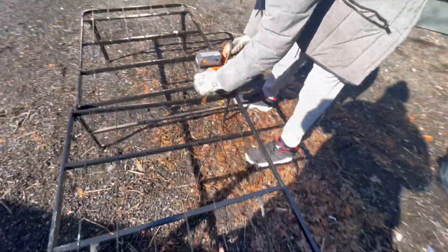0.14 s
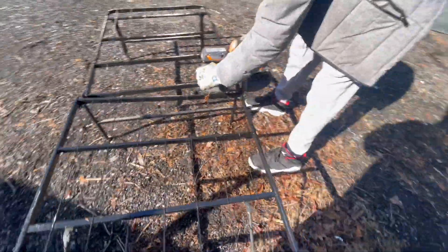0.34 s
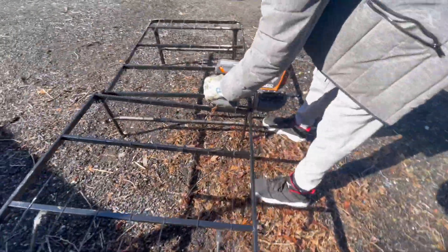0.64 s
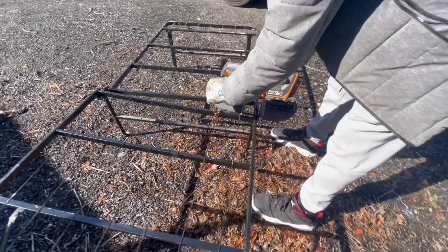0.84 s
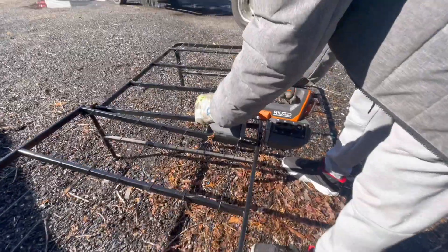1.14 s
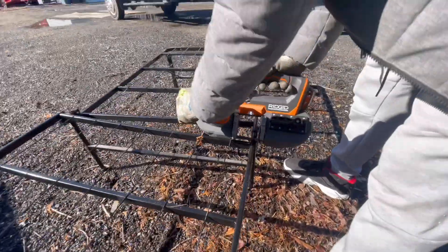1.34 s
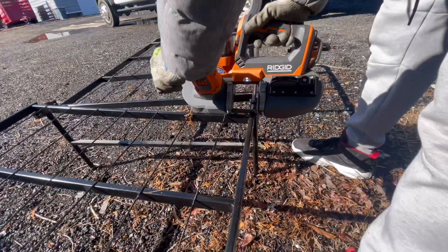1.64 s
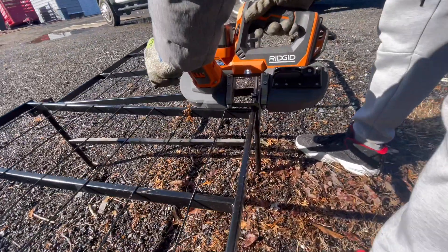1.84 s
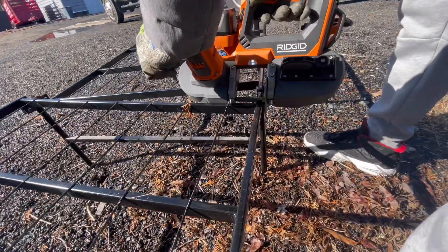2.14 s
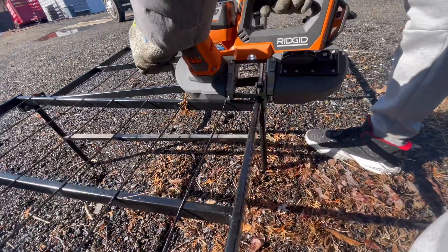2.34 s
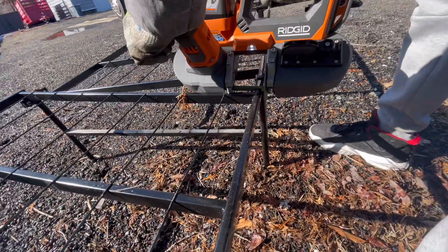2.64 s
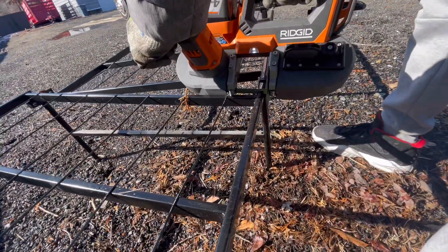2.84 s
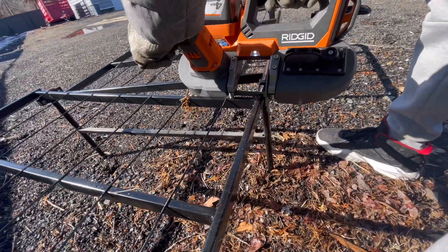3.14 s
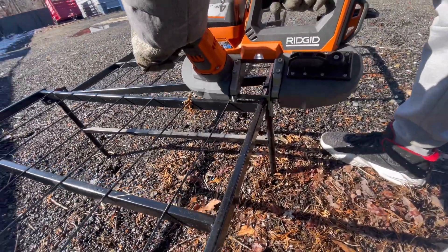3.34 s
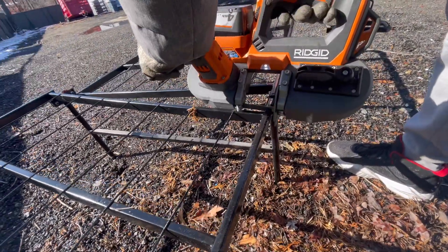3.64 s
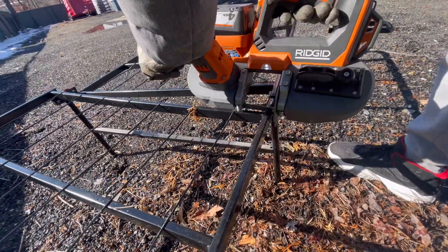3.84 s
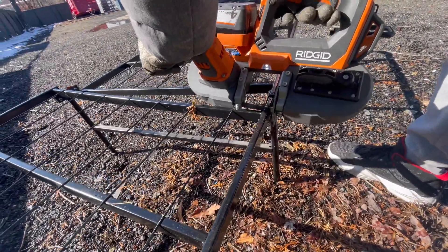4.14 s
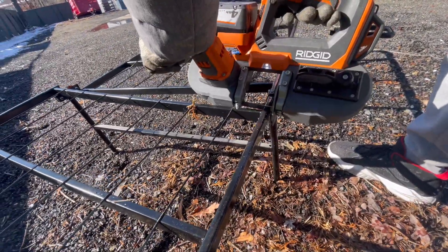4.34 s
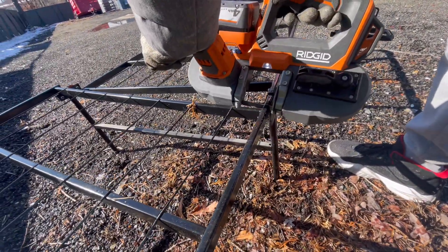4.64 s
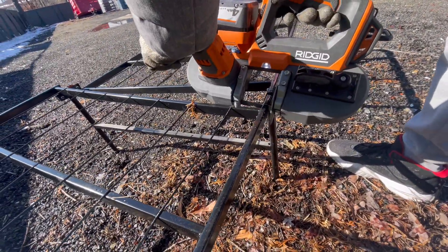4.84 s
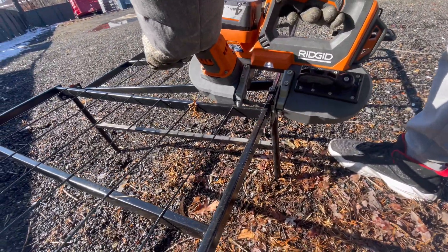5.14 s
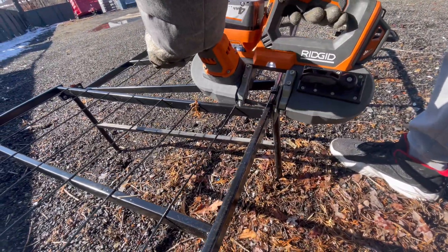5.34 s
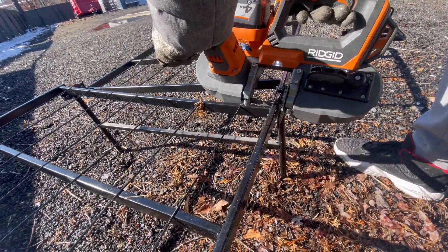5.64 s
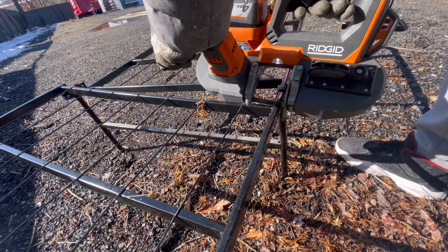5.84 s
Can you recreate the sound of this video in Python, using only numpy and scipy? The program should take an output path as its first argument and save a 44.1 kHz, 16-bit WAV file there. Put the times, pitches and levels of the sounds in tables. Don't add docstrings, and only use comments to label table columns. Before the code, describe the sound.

From 0 s a handheld bandsaw is already cutting a thin steel rail outdoors: loud bright rasp, motor and gear whirr, low frame chatter until about 0.3 s, and wind rumbling on the microphone until about 0.7 s. Whistling rail notes and brief piercing squeals dart through the first second, with heavy seam thumps near 0.4 and 0.65 s. From roughly 0.9 to 1.6 s the cutting thins and motor whirr is more exposed. At about 1.7 s the teeth catch sharply and a dense, gritty high hiss settles in as the phone comes close. The blade seam knocks and scrapes every 0.27 s, each followed by a small dip. Pressure eases briefly near 2.8 and 3.4 s; tonal whines lock in around 3.5 to 4.5 s. The rail rings less from 4 s, the speed sagging slightly at seams, then the cut softens after 5.5 s, still running at 6 s.

```python
import sys
import numpy as np
from scipy import signal
from scipy.fft import rfft, irfft, next_fast_len
from scipy.io import wavfile
from scipy.ndimage import uniform_filter1d

SR = 44100
rng = np.random.default_rng(int(sys.argv[2]) if len(sys.argv) > 2 else 0)


def volts(x):
    e = np.asarray(x, float) / 20
    return 10 ** e


def wav_record(signal):
    frames = np.transpose(np.atleast_2d(signal))
    bounded = np.clip(frames, -1, 1)
    quanta = np.round(bounded * 32767).astype(np.int16)
    wavfile.write(sys.argv[1], SR, quanta)


N = 264849
T = np.arange(N) / SR
PAD = next_fast_len(N + SR // 3)
HZ = np.arange(PAD // 2 + 1) * SR / PAD + 1e-9


def unit(x):
    return x / np.sqrt(np.mean(x ** 2))


def curves(table):
    s, *columns = np.transpose(table)
    return [np.interp(T, s, column) for column in columns]


def gains(table):
    hz, db = np.transpose(table)
    return volts(np.interp(np.log(HZ), np.log(hz), db))


def through(x, response):
    return irfft(rfft(x, PAD) * response, PAD)[..., :N]


def resonance(hz, width_hz):
    return 1j * HZ * width_hz / (hz ** 2 - HZ ** 2 + 1j * HZ * width_hz)


def band(lo_hz, hi_hz, order=8):
    low_cut = 1 + np.minimum(lo_hz / HZ, 9) ** (2 * order)
    high_cut = 1 + (HZ / hi_hz) ** (2 * order)
    return 1 / np.sqrt(low_cut * high_cut)


def walk(rate):
    hold = int(SR / rate)
    steps = np.repeat(rng.standard_normal(N // hold + 1), hold)
    slewed = uniform_filter1d(uniform_filter1d(steps, hold), hold)
    return unit(slewed[:N])


def bump(at_s, width_s):
    return np.exp(-.5 * ((T - at_s) / width_s) ** 2)


def clicks(at_s, size):
    place, out = at_s * SR, np.zeros(N + 32)
    for k in range(-7, 9):
        i = np.floor(place).astype(int) + k
        window = np.cos(np.pi * (i - place) / 16) ** 2
        np.add.at(out, np.clip(i, 0, N + 31), size * np.sinc(i - place) * window)
    return out[:N]


# (t/s, whirr level/dB, shaft tone level/dB)
MOTOR = [(0.0, -30.5, -85), (0.35, -30.5, -66), (0.7, -42.5, -61), (.8, -42.5, -57), (1.0, -40.5, -53),
         (1.4, -37, -51.5), (1.72, -35, -51), (1.95, -35.5, -53), (2.1, -36, -55), (2.4, -40.5, -58.5),
         (3.76, -41, -59.5), (4.85, -47.5, -68), (6.01, -48, -63)]
# (f/Hz, level/dB per Hz)
WHIRR = [(88, -70), (150, -25), (328, -25.5), (361, -21.5), (398, -15), (578, -10.5), (716, -5.5),
         (1660, -3.5), (2270, -3.5), (3840, -2), (5910, -17.5), (7920, -11.5), (16000, -18)]
# (multiple of shaft rate, level/dB)
GEAR = [
    (2, 10),
    (4, 2),
    (8, 1),
    (10.2, 2),
]


def motor(group_hz):
    whirr_db, shaft_db = curves(MOTOR)
    turn = np.pi * np.cumsum(group_hz * (1 + 0.00037 * walk(24.7))) / SR
    tones = volts(shaft_db + 1.5 * walk(3.76)) * np.sin(turn)
    for multiple, db in GEAR:
        level_db = np.minimum(whirr_db, -42.0) - 16.5 + db + 3.54 * walk(20)
        tones = tones + volts(level_db) * np.sin(multiple * turn + 0.54 * walk(40))
    crackle = volts(2.4 * rng.standard_normal(N)) * rng.standard_normal(N)
    whirr = through(crackle, gains(WHIRR))
    low = through(whirr, band(400, 2290))
    return tones + volts(whirr_db + 1.96 * walk(14)) * whirr / np.std(low)


# (t/s, whine level/dB, freedom level/dB)
FEED = [(0.0, -27, -3.5), (0.25, -28.5, 1), (0.42, -25, -1), (0.78, -28, -5.5), (0.9, -33, 2.5),
        (1.15, -41, 4), (1.6, -42.5, 4.5), (1.72, -30, -4.5), (1.87, -25, -3.5), (2.5, -26, -8),
        (2.95, -26.5, -5.5), (3.2, -30.5, -2), (3.6, -25, -6.5), (4.2, -23, -13), (4.6, -26, -12.5),
        (5.45, -29.5, -11), (5.62, -35, -9.5), (6.01, -33.5, -10.5)]


def feed():
    return curves(FEED)


# (f/Hz, width/Hz, level/dB)
BITE = [(2900, 100, -14), (3740, 160, -10), (4245, 48, 0.5), (5050, 170, -8), (6000, 180, -4),
        (6560, 135, -3.5), (7066, 200, 2), (8100, 85, 7), (8610, 174, 3), (11350, 150, -3.5),
        (12440, 530, 1), (14150, 500, 11), (15050, 350, 10)]
# (f/Hz, level/dB per Hz)
SCRAPE = [(590, -47), (1000, -21), (1730, -27.5), (2100, -1.5), (2500, -13), (4260, -6.5), (5440, -11),
          (6470, 3.5), (7530, -6), (8450, 2), (9830, -9), (13100, 9.5), (16000, -40)]
SET_DB = (8, 0, -1)


def teeth(group_hz, jitter=0.054, wear_db=0.5, chip_db=2.5, scrape_db=-2.5, skirt_db=-11.0):
    loop_teeth = 592
    count = np.cumsum(3 * group_hz) / SR
    n = np.arange(int(count[-1]))
    chance, wear = rng.standard_normal((len(n), 2)), rng.standard_normal(loop_teeth)
    size_db = np.array(SET_DB)[n % 3] + wear_db * wear[n % loop_teeth] + chip_db * chance[:, 0]
    at_s = np.interp(n + .5 + jitter * chance[:, 1], count, T)
    body = volts(skirt_db) + sum(volts(db) * resonance(hz, width) for hz, width, db in BITE)
    strikes = unit(through(clicks(at_s, volts(size_db)), body))
    tooth_now = np.minimum(count.astype(int), len(n) - 1)
    tearing = volts(size_db[tooth_now]) * rng.standard_normal(N)
    return strikes + volts(scrape_db) * unit(through(tearing, gains(SCRAPE)))


def steel(x):
    t60_s, share = .11, .8
    tail = np.arange(SR // 5) / SR
    ring = rng.standard_normal((2, len(tail))) * volts(-60 * tail / t60_s)
    ring = ring / np.sqrt(np.sum(ring ** 2, axis=1, keepdims=True))
    ring = through(x, rfft(ring, PAD))
    shift = np.pi * T / 2 + .5 * walk(1.947)
    return np.sqrt(1 - share ** 2) * x + share * (np.cos(shift) * ring[0] + np.sin(shift) * ring[1])


CUT_EDGES_HZ = (1600, 2600, 5400, 9800)
# (level/dB, share of rail freedom, share of quick pressure changes)
REGISTERS = [
    (-9.5, 0.97, 0.8),
    (-1.16, 0.83, 0.41),
    (0.02, 0.011, 0.94),
    (-3, 0.37, 0.79),
]


def cut(group_hz, feed_db, free_db, jolt_db):
    bite, edges = steel(teeth(group_hz)), (*CUT_EDGES_HZ, SR)
    shared_db = 1.5 * walk(45)
    mix = np.zeros(N)
    for lo, hi, (db, free, quick) in zip(edges, edges[1:], REGISTERS):
        level_db = feed_db + db + free * free_db + quick * jolt_db
        register = unit(through(bite, band(lo, hi)))
        mix = mix + volts(level_db + shared_db + 1.2 * walk(30)) * register
    return mix


# (level/dB re whine, share of rail freedom, patchiness level/dB)
SING_DB = [
    (-18.5, 0.3, 3),
    (-17.5, 0.4, 7),
    (-16, 0.13, 6),
    (-17.5, 0.096, 6),
]
# (t/s,
# length/s, group harmonic, level/dB)
SQUEAL = [(0.107, 0.32, 1, -39), (0.308, 0.033, 3, -23.5), (0.408, 0.058, 2, -32), (.42, 0.054, 6, -12.5),
          (0.81, 0.12, 4, -28), (1.0, 0.081, 3, -31), (1.89, 0.043, 4, -36), (2.1, 0.078, 4, -31),
          (4.4, 0.17, 3, -32), (4.633, 0.089, 3, -29.5), (0.0, 0.17, 3, -33), (.18, 0.054, 3, -30.5),
          (.45, 0.12, 3, -28.5), (.63, 0.095, 3, -35), (1.66, .04, 3, -33), (1.725, 0.029, 3, -31),
          (1.84, 0.036, 3, -34), (2.07, 0.082, 3, -31.5), (2.9, 0.11, 3, -33.5), (5.1, 0.066, 3, -55),
          (5.24, 0.098, 3, -50), (5.8, 0.23, 3, -46.5), (.3, 0.066, 9, -22), (.5, .06, 12, -25),
          (.6, 0.12, 12, -34), (3.28, 0.11, 12, -35), (5.15, .12, 9, -51), (2.62, 0.057, 9, -44),
          (.35, 0.065, 1, -43), (.482, 0.032, 1, -32), (.53, 0.022, 1, -40), (.575, .05, 1, -41),
          (.47, 0.18, 2, -44), (.76, 0.038, 2, -44), (.82, 0.11, 2, -49), (.49, 0.075, 4, -34),
          (.42, .07, 5, -38), (.55, .1, 5, -34), (.71, 0.06, 6, -35), (.75, 0.045, 3, -37),
          (3.94, 0.16, 3, -35.5), (4.28, 0.12, 3, -41.5),
          (0.203, 0.086, 6, -23), (0.306, 0.052, 6, -19.5), (0.48, 0.07, 6, -19.5), (0.603, 0.21, 6, -39),
        (0.383, 0.049, 9, -20.5), (1.087, .22, 6, -38), (1.651, 0.038, 12, -24), (1.94, 0.031, 6, -28),
        (2.075, 0.11, 6, -36), (2.09, 0.071, 12, -23.5), (2.203, 0.088, 6, -23.5), (2.42, 0.093, 6, -32),
        (2.434, 0.078, 9, -27), (2.849, 0.051, 9, -43), (2.875, 0.11, 12, -45), (3.504, 0.13, 3, -35),
        (3.528, 0.14, 9, -25), (3.529, 0.1, 12, -23), (3.736, 0.11, 12, -32), (3.852, 0.0695, 3, -26.5),
        (3.899, 0.37, 12, -27.5), (4.014, 0.06, 9, -39), (4.107, 0.11, 3, -29), (4.449, 0.2, 12, -27),
        (4.495, 0.11, 9, -47), (4.884, 0.08, 12, -28), (4.903, 0.16, 9, -37), (5.299, 0.068, 12, -47),
        (5.302, 0.19, 9, -29.5)]


def sing(group_hz, whine_db, free_db, rasp=.3):
    swell_s = .014
    turn = 2 * np.pi * np.cumsum(group_hz) / SR
    slip, quick_slip = .4 * walk(70), rasp * walk(220)
    tone = {}
    for h in (1, 2, 3, 4, 5, 6, 9, 12):
        tone[h] = np.sin(h * (turn + slip / 3) + max(h / 3 - 1, 0) * quick_slip)
    tones = np.zeros(N)
    for k, (db, free, patchy_db) in enumerate(SING_DB):
        level_db = whine_db + db + free * free_db + patchy_db * walk(50) + 2.4 * walk(16)
        tones = tones + volts(level_db) * np.sqrt(2) * tone[3 * k + 3]
    flutter = [volts(2.6 * walk(50.6)) for _ in range(4)]
    for k, (s, length, harmonic, db) in enumerate(SQUEAL):
        swell = np.clip(np.minimum(T - s, s + length - T) / swell_s + .3, 0, 1)
        tones = tones + swell * volts(db) * flutter[k % len(flutter)] * tone[round(harmonic)]
    return tones


# (f/Hz, level/dB, t60/s)
THUMP = [(700, -19.5, 0.088), (863, -1, 0.045), (1117, 4, 0.17), (1510, -13, 0.025)]


def rattle():
    settles_s, settle_db_per_s = 0.27, 100
    level_db = -34 - settle_db_per_s * np.maximum(T - settles_s, 0)
    modes = sum(volts(db) * resonance(hz, 75.0) for hz, db, _ in THUMP)
    return volts(level_db + 2.0 * walk(37)) * unit(through(rng.standard_normal(N), modes))


# (t/s, length/s, f/Hz, level/dB)
WHISTLE = [
    (.02, .27, 1110, -38.5),
    (.21, .2, 4170, -29),
    (.37, .04, 2245, -27),
    (.71, .06, 3600, -38),
    (.49, .05, 2330, -39),
    (.53, .06, 4140, -28),
    (.6, .17, 4210, -35),
    (.92, .06, 4190, -34),
    (.03, .08, 2150, -36),
    (.02, .1, 1890, -34),
]


def whistle():
    waver, flutter_db = 1.1 * walk(60), 2.4 * walk(43.6)
    mix = np.zeros(N)
    for s, length, hz, db in WHISTLE:
        swell = np.clip(np.minimum(T - s, s + length - T) / .012, 0, 1)
        mix = mix + swell * volts(db + flutter_db) * np.sin(2 * np.pi * hz * T + waver)
    return mix


# (t/s, half width/s, level/dB)
GUSTS = [(.2, 0.23, -40.5), (.39, 0.021, -45), (.5, 0.0065, -55), (.543, 0.0065, -44), (.6, 0.053, -41),
         (.68, 0.041, -49), (.74, .005, -50), (.9, 0.074, -66), (2.3, 0.19, -65), (2.56, 0.015, -56),
         (2.83, .06, -62), (3.6, .2, -65.5), (4.151, 0.03, -58), (4.5, 0.079, -68), (5.6, 0.052, -58),
         (5.78, 0.031, -62), (5.921, 0.069, -65)]
# (f/Hz, level/dB per Hz)
GUST = [(12, -44), (24, -40), (59, 2), (206, -5.5), (375, -10.5), (445, -9.5), (600, -19), (780, -46),
        (1320, -120)]


def wind():
    breeze_db = -65
    gust = volts(breeze_db) + sum(volts(db) * bump(s, width) for s, width, db in GUSTS)
    sides = []
    for side in (1, -1):
        rumble = unit(through(rng.standard_normal(N), gains(GUST)))
        sides.append(gust * volts(3.0 + 0.89 * side + 2.8 * walk(21.99)) * rumble)
    return np.array(sides)


# (t/s, thump level/dB, scrape level/dB, ring level/dB, level/dB of the hop after it)
WELD = [(0.379, -19.5, -38.5, -55, -.5), (0.658, -25.5, -29.5, -38, -1.28), (0.929, -29, -27.5, -58, -4),
        (1.209, -30.5, -33, -38.5, -1.43), (1.471, -49, -33.5, -56, -1.14), (1.728, -28, -27, -35, -6.5),
        (1.996, -24.5, -21, -36, -9), (2.267, -27, -21.5, -36, -7), (2.542, -28, -24, -29, -8.5),
        (2.81, -27, -25.5, -29.5, -8), (3.08, -30, -27, -28, -4), (3.349, -29, -25, -35.5, -2.5),
        (3.617, -32.5, -24.5, -32, -7), (3.889, -29, -24.5, -47, -2), (4.164, -33, -29.5, -35, -0.64),
        (4.437, -30, -26, -36, -0.7), (4.713, -34.5, -29, -50, -5.5), (4.984, -33.5, -28.5, -50, -7),
        (5.26, -34, -27.5, -52, -5), (5.527, -33.5, -27, -61, -5), (5.809, -47, -34.5, -63, -3)]


def weld(drag, knock_s=0.014, grind=0.22):
    ring_hz, ring_t60_s = 2013, 0.26
    at_s, thump_db, _, ring_db, _ = np.transpose(WELD)
    knocks = clicks(at_s, volts(thump_db))
    fading = 1 / (1 - np.exp(-1 / (knock_s * SR) - 2j * np.pi * HZ / SR))
    contact = through(knocks, fading)
    modes = sum(volts(db) * resonance(hz, 6.3 / t60) for hz, db, t60 in THUMP)
    thump = through(knocks + grind * contact * rng.standard_normal(N), modes)
    colour = gains(SCRAPE) * band(500, 6240, order=2)
    scrape = drag * unit(through(rng.standard_normal(N), colour))
    ring = through(clicks(at_s + .006, volts(ring_db)), resonance(ring_hz, 1.83 / ring_t60_s))
    return volts(28.5) * thump + volts(5.0) * scrape + volts(62.0) * ring


def seam_drag(rise_s=0.00276, drag_s=0.013):
    return sum(volts(db) * bump(s + 0.00542, np.where(T < s + .003, rise_s, drag_s)) for s, _, db, *_ in WELD)


def seam_sag():
    slows_s, recovers_s = .035, .07
    dips = sum(bump(row[0], np.where(T < row[0], slows_s, recovers_s)) for row in WELD)
    return 11 * bump(4.15, .55) * dips


# (t/s, half width/s, level/dB)
PRESS = [(.43, 0.01798, 4), (.53, 0.018, 3), (0.87, 0.029, -3), (1.037, 0.024, 7), (1.669, 0.021, 12),
         (1.802, 0.026, -9), (2.11, 0.015, 2.5), (2.19, 0.012, -5), (2.389, 0.02, -2.5), (2.511, 0.016, -6),
         (2.659, 0.024, 1.5), (2.768, 0.027, -19), (2.898, 0.024, 5.5), (3.03, 0.027, -3.5),
         (3.44, 0.042, -12.5), (3.56, 0.022, 4), (3.701, 0.043, -3), (4.03, 0.031, -3),
         (4.309, 0.028, -5.5), (4.41, 0.029, 3), (4.85, 0.022, -5.5), (4.919, .03, 1.5), (5.13, 0.031, -2),
         (5.371, 0.012, 3), (5.41, 0.013, -2), (5.691, 0.015, -5), (5.73, .012, 1.5), (5.92, 0.028, -4),
         (1.869, .012, -2), (2.02, 0.011, -3), (2.155, 0.011, 3), (2.7, 0.021, -4), (2.795, 0.0077, -6),
         (3.105, 0.0089, 3.5), (3.136, .015, -4), (3.895, 0.014, 3), (4.2, 0.019, -3), (4.34, 0.014, 2.5),
         (4.43, .01, 3.5), (4.479, .02, 4), (4.59, .015, -3.5), (4.65, 0.013, 4), (5.845, .012, -3),
         (5.98, .02, -1)]
# (t/s, level/dB)
CATCH = [(1.645, 3), (1.728, 7), (1.831, 5), (2.328, 3), (2.424, 3), (2.638, 2.5), (2.813, 3), (2.874, 3.5),
         (3.478, 2), (3.541, 2.5), (3.769, 3), (4.546, 2.5), (5.32, 3), (5.603, 3.5), (5.717, 2.5),
         (5.812, 5)]


def jolts(feed_db, drag):
    catch_rise_s, catch_fall_s = 0.0014, .02
    hop_after_s, hop_width_s, seam_load_db = 0.05456, .014, 1.5
    hands = sum(db * bump(s, width) for s, width, db in PRESS)
    hands = hands + sum(db * bump(s, np.where(T < s, catch_rise_s, catch_fall_s)) for s, db in CATCH)
    hops = sum(row[-1] * bump(row[0] + hop_after_s, hop_width_s) for row in WELD)
    shove = uniform_filter1d(drag, SR // 150) * volts(seam_load_db - feed_db - hands)
    return hands + hops + 10 * np.log10(1 + shove ** 2)


# (t/s, f/Hz)
SPEED = [(0, 643), (.26, 650), (.31, 672), (.48, 709), (.55, 694), (.62, 706), (.76, 717), (.8, 737),
         (1.5, 731), (1.72, 729), (2.3, 726), (2.45, 720), (2.75, 727), (3.0, 722), (3.2, 732), (3.6, 725),
         (4.6, 720), (6.01, 730)]


def blade_speed(jolt_db):
    sag_hz_per_db, sag_s = 1.32, 0.038
    load_db = uniform_filter1d(np.clip(jolt_db, -8, 12), int(sag_s * SR))
    return curves(SPEED)[0] - sag_hz_per_db * load_db - seam_sag()


# (f/Hz, width/Hz, depth 0-1, share of f it sways)
NULLS = [(2570, 260, .72, .03), (3270, 380, .85, .03), (3900, 240, .8, .025), (4800, 120, .45, .01),
         (5440, 220, .9, .005), (10000, 600, .65, .01)]


def hollow(saw):
    far_share, crouch_s, crouch_length_s = .38, 1.2, .7
    hollowed = []
    for way in (-1, 1):
        dips = [1 - depth * resonance(hz * (1 + way * share), width) for hz, width, depth, share in NULLS]
        hollowed.append(np.prod(dips, axis=0))
    low, high = through(saw, np.array(hollowed))
    sway = .5 + .5 * np.tanh(walk(5))
    near = far_share + (1 - far_share) * np.clip((T - crouch_s) / crouch_length_s, 0, 1)
    return saw + near * (low + sway * (high - low) - saw)


# (f/Hz, side minus mid level/dB)
SIDE_DB = [(60, -3), (200, -15), (380, -14), (700, -1), (1300, 0.5), (2400, 4), (8000, 2.4), (10300, 7.5),
           (11500, 3.5), (13500, -12), (16000, -15)]
# (f/Hz, share of the side that is echo)
SCATTER = [(100, .9), (1000, .93), (4000, .88), (14000, .88)]


def ports(x, pan_db=2, scatter_t60_s=0.026):
    side_gain = gains(SIDE_DB) * volts(-2.0)
    hz, echo_share = np.transpose(SCATTER)
    share = np.clip(np.interp(np.log(HZ), np.log(hz), echo_share), 0, 1)
    tail = np.arange(SR // 16) / SR
    echo = rfft(rng.standard_normal((3, len(tail))) * volts(-60 * tail / scatter_t60_s), PAD)
    echo = echo / np.abs(echo) ** .7 / np.mean(np.abs(echo) ** .3)
    paths = through(x, echo * side_gain * share)
    side = through(x, 1j * side_gain * np.sqrt(1 - share ** 2))
    side = side + sum(walk(30) * path for path in paths) / np.sqrt(3)
    return np.array([x + side, x - side]) * volts(np.array([[pan_db], [-pan_db]]) / 2)


def scene():
    feed_db, free_db = feed()
    drag = seam_drag()
    jolt_db = jolts(feed_db, drag)
    group_hz = blade_speed(jolt_db)
    blade = cut(group_hz, feed_db, free_db, jolt_db) + sing(group_hz, feed_db + jolt_db, free_db)
    blade = blade + rattle() + whistle() + weld(drag)
    saw = motor(group_hz) + blade
    return ports(hollow(saw)) + wind()


def band_limit(x):
    return signal.sosfilt(signal.butter(12, 16680, fs=SR, output="sos"), x)


def record(dry):
    top_hz = 15770
    rounded = np.tanh(0.74 * dry) / 0.91
    finished = through(rounded, HZ < top_hz)
    return band_limit(finished)


dry = scene()
out = record(dry)
wav_record(out)
```